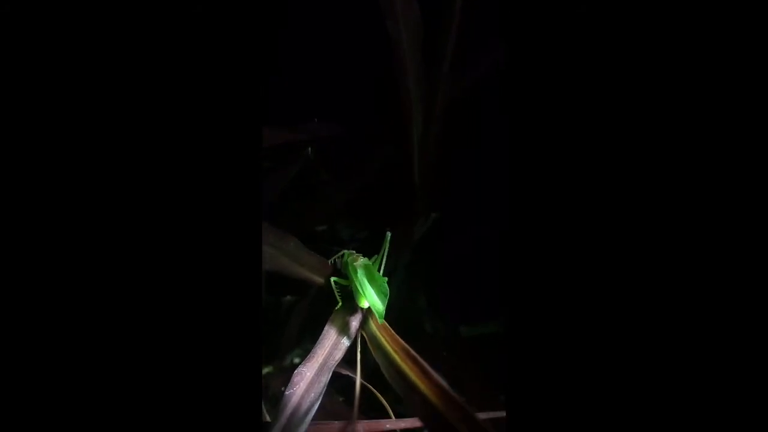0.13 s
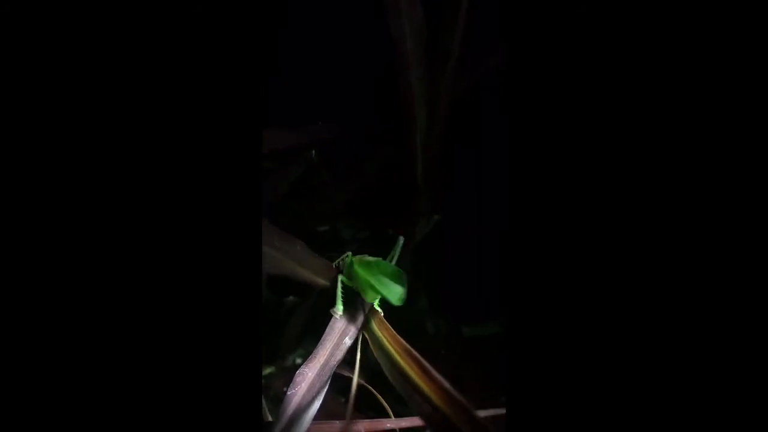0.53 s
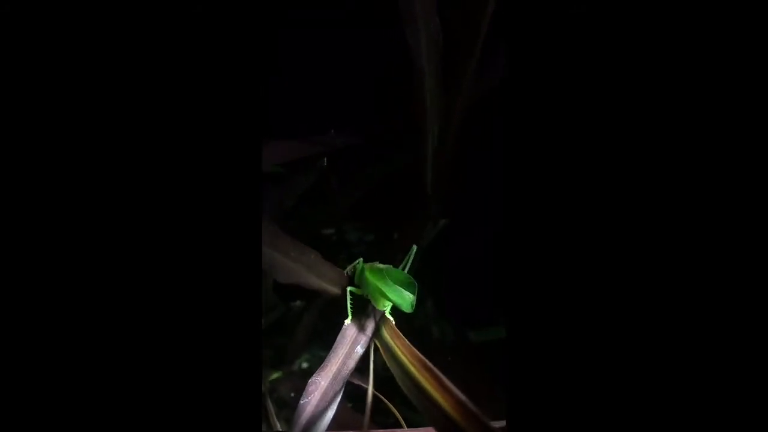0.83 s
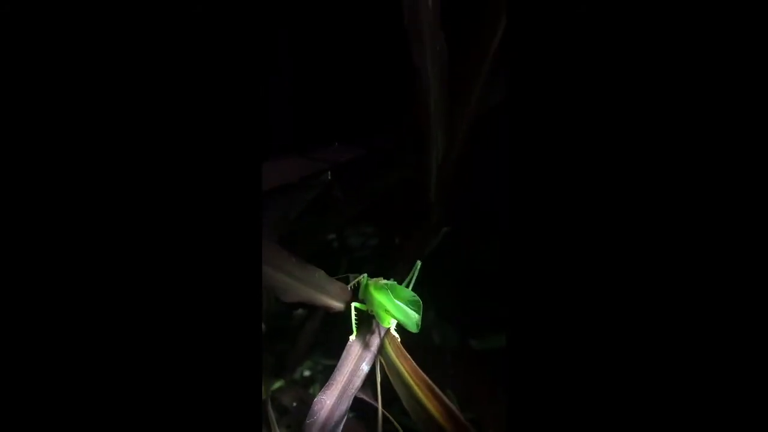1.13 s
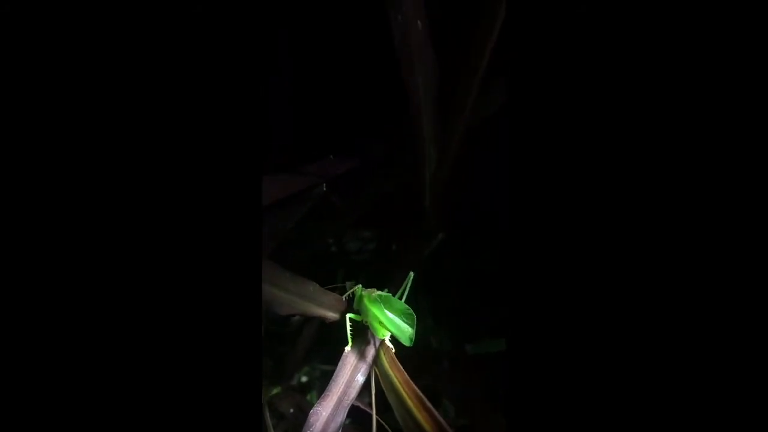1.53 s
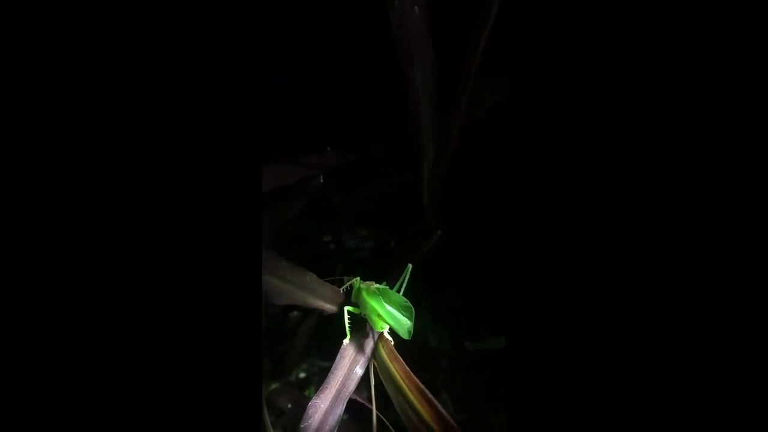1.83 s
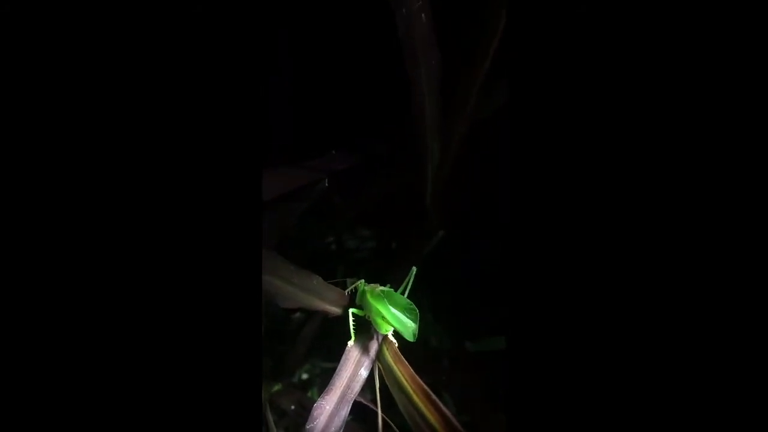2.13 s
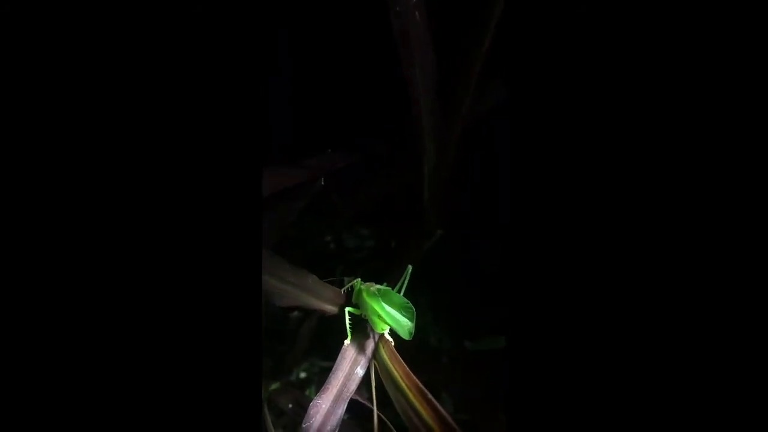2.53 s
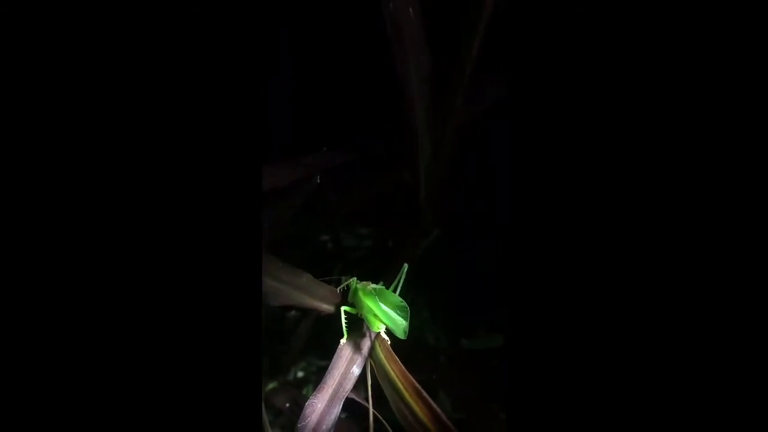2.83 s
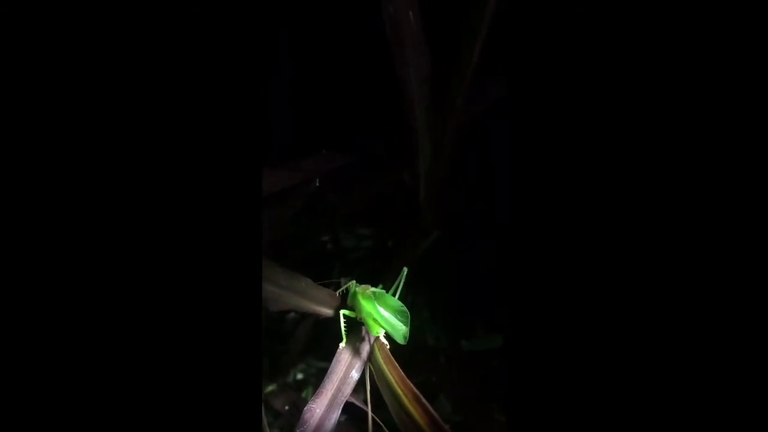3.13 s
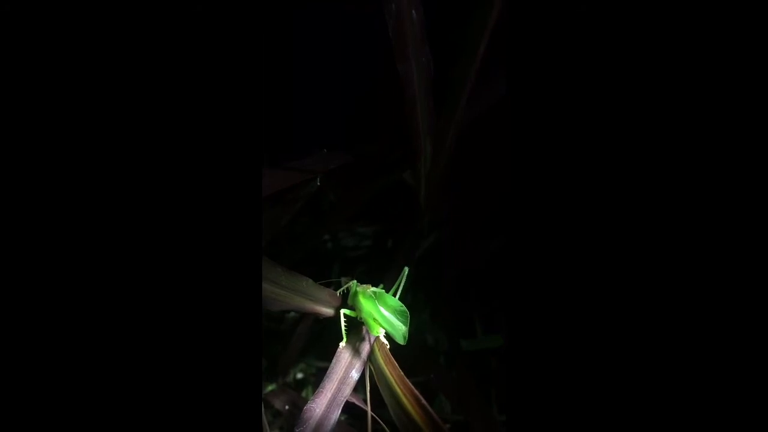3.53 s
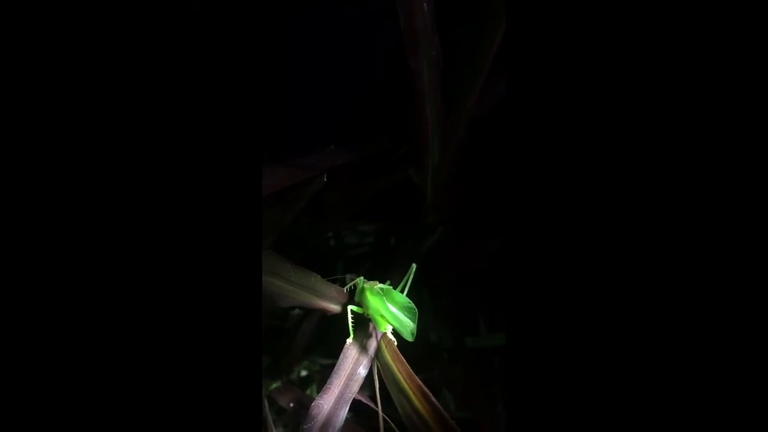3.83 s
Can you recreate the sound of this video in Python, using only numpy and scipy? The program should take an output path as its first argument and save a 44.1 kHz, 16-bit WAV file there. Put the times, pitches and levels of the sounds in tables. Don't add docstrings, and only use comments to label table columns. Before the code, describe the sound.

A bush cricket close to the microphone ticks dryly at the start as a distant insect buzz ends near 0.2 seconds. Five rapid rasps begin around 0.5, 1.3, 1.9, 2.5 and 3.1, each swelling from soft scratch to sharp bright zip within about 0.15 seconds. Single ticks follow them. Far buzzes return near 0.8, 1.9 and 2.9, over faint chirps, insect hiss and low rumble, quietening after 3.4.

```python
import sys
import numpy as np
from scipy import signal
from scipy.fft import irfft
from scipy.io import wavfile
from scipy.ndimage import uniform_filter1d, map_coordinates

SR = 44100
rng = np.random.default_rng(int(sys.argv[2]) if len(sys.argv) > 2 else 0)


def wav_out(sig):
    wavfile.write(sys.argv[1], SR, np.round(np.clip(np.atleast_2d(sig).T, -1, 1) * 32767).astype(np.int16))


def boost_factor(decibels):
    exponent = np.asarray(decibels, float) / 20
    return 10 ** exponent


N = 176400

# first stroke [s], start of swell [s], last firm stroke [s], stroke rate [1/s].
PHRASES = [
    (.505, .5808, .6381, 346.6),
    (1.344, 1.4164, 1.4794, 346.9),
    (1.912, 1.996, 2.0567, 343.9),
    (2.482, 2.5688, 2.6241, 341.3),
    (3.086, 3.1759, 3.2399, 341.8),
]
# time after the first stroke [s], peak level [dB].
OPENING_LEVELS = [(0, -37), (.008, -35), (.021, -27), (.034, -30)]
# time from the swell [s], peak level [dB].
SWELL_LEVELS = [(-.032, -29), (-.018, -25), (-.004, -22), (0, -14), (.011, -9), (.02, -4)]
# time after the last firm stroke [s], peak level [dB].
DYING_STROKES = [(.0033, -23), (.0062, -29), (.009, -36)]
# time from the swell [s], tooth rate [Hz], firmness [0-1].
PRESSURE = [(-.03, 6000, .02), (-.003, 6800, .4), (.008, 9200, .8), (.019, 10550, 1)]
# frequency [Hz], level in soft strokes [dB], in firm strokes [dB], in ticks [dB],
# T60 [s].
WING_MODES = [(3704, -32.5, -10.5, -49, 0.0036), (7130, -24, -23.5, -9.5, 0.00064),
              (8240, -13.5, -5, -4.5, 0.0018), (11520, -3.5, 10.5, -6, .001),
              (12550, -22, -12.5, -5, 0.0021), (13930, 25, 22.5, -8, 0.00071),
              (14600, -1.5, 15, -6.5, 0.0024)]
MODE_SIGNS = [1, -1, 1, -1, 1, -1, 1]
# time [s], peak level [dB].
TICKS = [(0.0123, -21.5), (0.1509, -18.5), (0.6813, -10), (1.3382, -37), (1.51, -18), (1.6433, -18),
         (2.0878, -18), (2.2309, -13.5), (2.6554, -17), (2.7973, -17.5), (3.269, -19.5), (3.4064, -15.5),
         (3.9294, -56)]
# start [s], end [s], final level [dB].
TRILLS = [
    (-.15, .206, -54.5),
    (0.84, 1.214, -51),
    (1.913, 2.286, -51.5),
    (2.924, 3.36, -54.5),
]
# start of one chirp [s], period [s], top pitch [Hz], fall [Hz], length [s], level [dB].
CHIRPERS = [
    (.946, .05004, 4830, 480, .038, -63),
    (2.238, .047, 4780, 480, .034, -63),
]
# time [s], gain of the first [dB], of the second [dB].
AIR_CARRY = [(0, 6.5, -8), (.3, 9, 4), (.75, -2, 1), (1.05, 5.5, -10), (1.4, -2, 8), (1.8, 11.5, -1),
             (2.3, -22, 9), (2.7, 4, -4), (2.9, 3.5, 13), (3.3, 5, -17), (3.55, 4.5, 4), (4, -1, -8)]
# frequency [Hz], level [dB].
RUMBLE_SPECTRUM = [(28, -34), (45, 0), (120, -2.5), (250, -11), (430, -24.5), (980, -16), (1600, -21),
                   (2800, -40)]
# frequency [Hz], width [Hz], level
# [dB].
HUMS = [(56.8, 7, -46.5), (105.47, 2, -42.5), (131.35, 3.9, -43.5), (205, 12.2, -48), (3537, 330, -72)]
# frequency [Hz], level [dB].
AIR_SPECTRUM = [(3000, 14), (3400, -6), (4000, -30), (6500, -1), (7800, -28), (12500, -24), (15000, -17),
                (16500, -26)]


def phrase(first, swell, last, rate):
    fresh_share, faster_soft_strokes, stroke_spread_db = .35, 1.018, .8
    near_db, push_db, push_s = -2, 3.5, .066
    soft_length_s, firm_length_s = .0017, .0005
    soft_jitter, firm_jitter = .3, .035

    draws = rng.standard_normal((64, 40))
    draws = fresh_share * draws + 3 * (1 - fresh_share) * uniform_filter1d(draws, size=9, axis=0)

    back = np.arange(61) / rate
    firm_part = last - swell
    back = np.where(back > firm_part, firm_part + (back - firm_part) / faster_soft_strokes, back)
    s = np.r_[last + np.array(DYING_STROKES)[:, 0], last - back]

    since = np.where(s > last, -1, s - swell)
    t, teeth_hz, firm = np.transpose(PRESSURE)
    teeth_hz = np.interp(since, t, teeth_hz)
    firm = np.clip(np.interp(since, t, firm), 0, 1)

    shape = [(first + t, db) for t, db in OPENING_LEVELS]
    shape += [(swell + t, db) for t, db in SWELL_LEVELS]
    shape += [(last, -4)]
    shape += [(last + t, db) for t, db in DYING_STROKES]
    level_db = np.interp(s, *np.transpose(shape)) + stroke_spread_db * draws[:, -1]
    level_db = np.where(s < first - .001, -140, level_db)
    level_db = level_db + near_db + push_db * np.clip((s - swell) / push_s, 0, 1)

    soft = 1 - firm
    starts = s + .000006 * (1 + 4 * soft) * draws[:, -2] - soft * soft_length_s / 2
    length_s = soft_length_s + firm * (firm_length_s - soft_length_s)
    jitter = soft_jitter + firm * (firm_jitter - soft_jitter)
    soft_db, firm_db = np.array(WING_MODES)[:, 1], np.array(WING_MODES)[:, 2]
    modes_db = soft_db + firm[:, None] * (firm_db - soft_db)
    return strokes(starts, level_db, teeth_hz, length_s, jitter, modes_db, draws)


def ticks():
    s, db = np.transpose(TICKS)
    one = np.ones(len(s))
    draws = rng.standard_normal((len(s), 40)) / 2
    modes_db = np.array(WING_MODES)[:, 3] * one[:, None]
    return strokes(s + .000445, db, 5500 * one, .0003 * one, one / 10, modes_db, draws)


def strokes(s, peak_db, teeth_hz, length_s, jitter, modes_db, draws):
    size, tooth = 512, np.arange(14)
    glide, tooth_spread_db, mode_spread_db = .16, 14, 2
    radiates_above_hz = 2600
    echo_s, echo = .000238, -.4
    w = 2 * np.pi * np.fft.rfftfreq(size, 1 / SR)

    at = (tooth * (1 - glide * tooth / 12) + jitter[:, None] * draws[:, :14]) / teeth_hz[:, None]
    weight = np.clip((length_s[:, None] - at) * teeth_hz[:, None], 0, 1)
    weight = weight * boost_factor(tooth_spread_db * jitter[:, None] * draws[:, 14:28])
    first = np.floor(s * SR).astype(int) - 32
    lag = at + (s - first / SR)[:, None]
    teeth = np.einsum("sk,skw->sw", weight, np.exp(-1j * lag[..., None] * w))

    u = 1j * w / (2 * np.pi * radiates_above_hz)
    radiated = (u * u / (u * u + np.sqrt(2) * u + 1)) ** 2
    radiated = radiated * (1 + echo * np.exp(-1j * w * echo_s))

    hz, t60 = np.array(WING_MODES)[:, 0], np.array(WING_MODES)[:, -1]
    w0, fade = 2 * np.pi * hz[:, None], np.log(1000) / t60[:, None]
    modes = np.array(MODE_SIGNS)[:, None] * radiated * w0 / (w0 ** 2 + (fade + 1j * w) ** 2)
    gains = boost_factor(modes_db + mode_spread_db * draws[:, 28:28 + len(WING_MODES)])

    waves = irfft(teeth * (gains @ modes) * (w < 2 * np.pi * 19000), size)
    power = 2 * np.sum(waves ** 2, axis=1) / (length_s * SR)
    waves *= (boost_factor(peak_db) / np.sqrt(power))[:, None]
    out = np.zeros(N + size)
    np.add.at(out, first[:, None] + np.arange(size), waves)
    return out[:N]


def scrape(near):
    rubbing = rms_one(band(rng.standard_normal(N), 1800, 7700))
    return boost_factor(-29.5) * uniform_filter1d(np.abs(near), size=24) * rubbing


def scatter(x, t60, low_hz):
    t = np.arange(6000) / SR
    tail = band(rng.standard_normal(6000), low_hz, 17000)
    tail = tail * boost_factor(-60 * t / t60) * (t > .0005)
    return signal.fftconvolve(x, tail / np.sqrt(np.sum(tail ** 2)))[:N]


def triller():
    tone_hz, rate_hz, slowing, glide = 7170, 188, .05, .055
    attack_s, t60_s, swell_db, octave_db = .0009, .008, 11, -20
    t, out = np.arange(N) / SR, np.zeros(N)
    for start, end, db in TRILLS:
        part = (t - start) / (end - start)
        rate = rate_hz * (1 - slowing * part) * (part < 1)
        cycle = -np.cumsum(rate[::-1])[::-1] / SR % 1
        age = cycle / rate_hz
        pulse = np.minimum(age / attack_s, 1) * boost_factor(-60 * np.maximum(age - .0015, 0) / t60_s)
        phase = 2 * np.pi * np.cumsum(tone_hz * (1 + glide * (1 - 2 * cycle) + .0051 * drift(34))) / SR
        gain = boost_factor(db + 9.5 - swell_db * (2 - part) + 2 * drift(32)) * (part > 0) * (part < 1)
        out += gain * pulse * (np.sin(phase) + boost_factor(octave_db) * np.sin(2 * phase))
    return out


def chirpers():
    t, out = np.arange(N) / SR, 0
    s, *carry_db = np.transpose(AIR_CARRY)
    for (start, period, hz, fall, length, db), far_db in zip(CHIRPERS, carry_db):
        part = np.clip((t - start + .003 * drift(5.3)) % period / length, 0, 1)
        phase = 2 * np.pi * np.cumsum(hz - fall * part) / SR
        gain = boost_factor(db + 1 + np.interp(t, s, far_db) + 2 * drift(16))
        envelope = np.abs(np.sin(np.pi * part)) ** .5 * (part < 1)
        out = out + gain * envelope * np.sin(phase)
    return out


def chorus():
    throb_hz = 128 * (1 + .0194 * drift(2.4))
    throb = 1 + .31 * np.sin(2 * np.pi * np.cumsum(throb_hz) / SR)
    hiss = rms_one(band(rng.standard_normal(N), 9430, 11330, order=5))
    return boost_factor(-60.5 + .62 * drift(2.42)) * throb * hiss


def rumble():
    out = boost_factor(-38) * band(banded_noise(RUMBLE_SPECTRUM, patchy_db=1.0), 20, 3700)
    for hz, width, db in HUMS:
        hum = rms_one(band(rng.standard_normal(N), hz - width / 2, hz + width / 2, order=1))
        out = out + boost_factor(db + 2 * drift(2)) * hum
    return out


def air():
    return boost_factor(-90.5) * banded_noise(AIR_SPECTRUM, patchy_db=-0.5)


def banded_noise(spectrum, patchy_db):
    hz, db = np.transpose(spectrum)
    edges = np.geomspace(20, 17000, 25)
    white, together = rng.standard_normal((2, N)), drift(2.5)
    out = 0
    for k, (low, high) in enumerate(zip(edges, edges[1:])):
        level_db = np.interp(np.log(low * high) / 2, np.log(hz), db, left=-90, right=-90)
        flicker_db = patchy_db * (.2 * together + drift(9))
        out = out + boost_factor(level_db + flicker_db) * band(white[k % 2], low, high)
    return rms_one(out)


def band(x, low_hz, high_hz, order=2):
    return signal.sosfilt(signal.butter(order, [low_hz, high_hz], "band", fs=SR, output="sos"), x)


def drift(rate_hz):
    knots = rng.standard_normal(400)
    return map_coordinates(knots, [np.arange(N) / SR * 2 * rate_hz], order=3, mode="wrap")


def rms_one(x):
    return x / np.sqrt(np.mean(x ** 2) + 1e-20)


def scene():
    near = sum(phrase(*row) for row in PHRASES) + ticks()
    near = near + scrape(near)
    near = near + boost_factor(-14) * scatter(near, t60=.014, low_hz=3500)
    callers = triller() + chirpers()
    field_share = .55
    callers = (1 - field_share) * callers + field_share * scatter(callers, t60=.07, low_hz=2600)
    return (near + callers + chorus() + rumble() + air())[None]


def top_cut(x):
    return signal.sosfilt(signal.butter(12, 17130, fs=SR, output="sos"), x)


def record(dry):
    duck_above_db, duck_share, attack_s, recover_db_per_s = -16.5, .96, .032, 13
    level_db = 10 * np.log10(uniform_filter1d(dry[0] ** 2, size=256) + 1e-12)
    level_db[0] = -14.5
    recovery_db = recover_db_per_s * np.arange(N) / SR
    held_db = np.maximum.accumulate(level_db + recovery_db) - recovery_db
    cut_db = duck_share * np.maximum(held_db - duck_above_db, 0)
    r = np.exp(-1 / (attack_s * SR))
    cut_db = signal.lfilter([1 - r], [1, -r], cut_db, zi=[r * cut_db[0]])[0]
    x = dry * boost_factor(-cut_db)
    x = signal.sosfilt(signal.ellip(8, .5, 45, 15750, fs=SR, output="sos"), x)
    x = signal.sosfilt(signal.butter(2, 35, "high", fs=SR, output="sos"), x)
    return top_cut(x)


dry = scene()
out = record(dry)
wav_out(out)
```